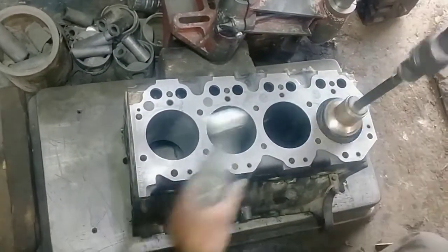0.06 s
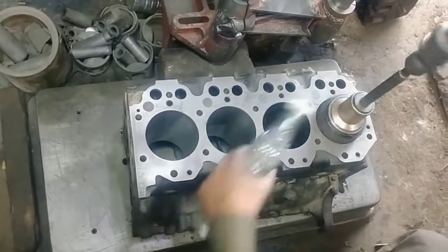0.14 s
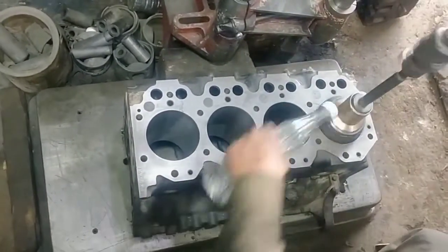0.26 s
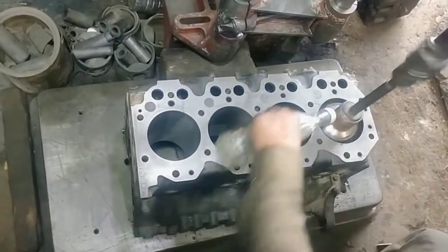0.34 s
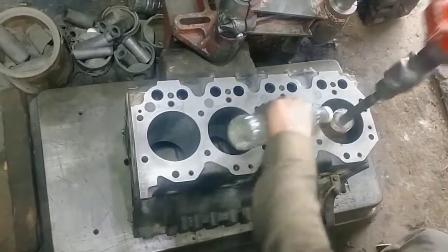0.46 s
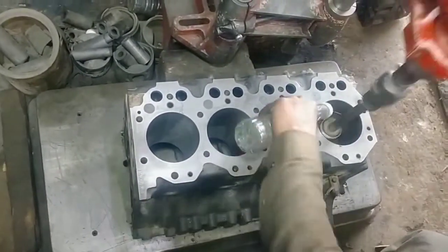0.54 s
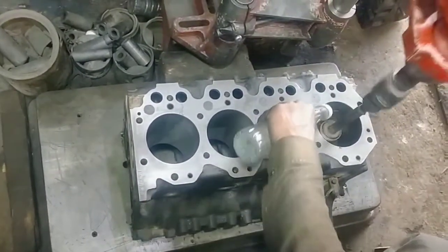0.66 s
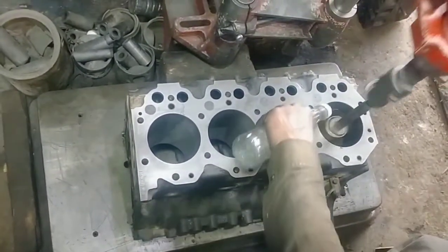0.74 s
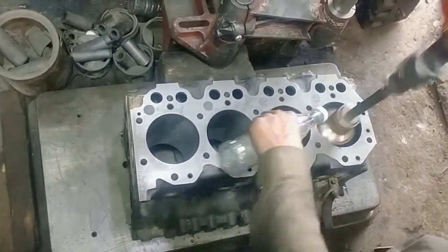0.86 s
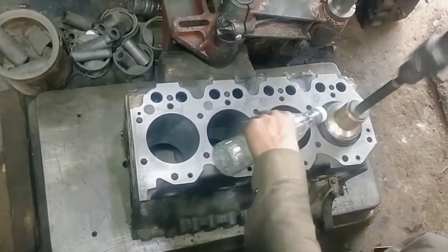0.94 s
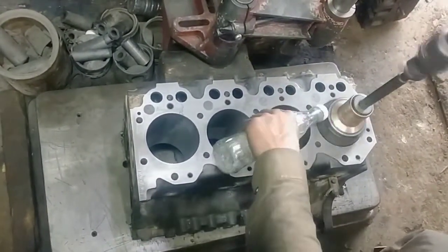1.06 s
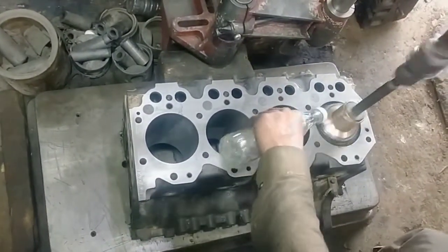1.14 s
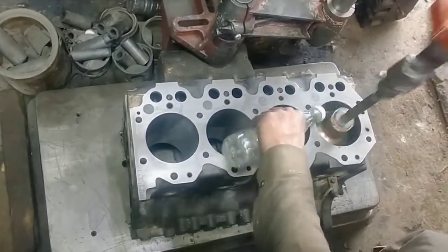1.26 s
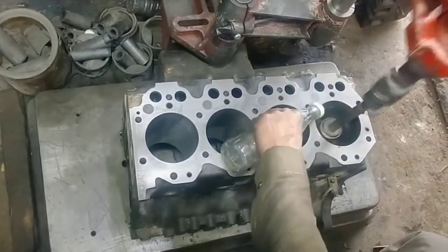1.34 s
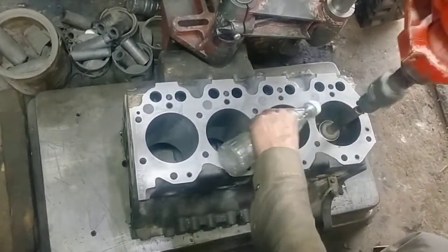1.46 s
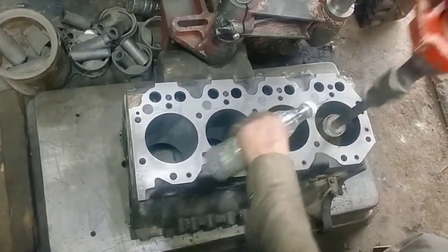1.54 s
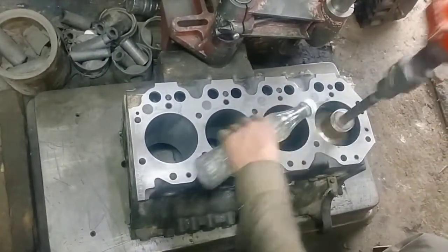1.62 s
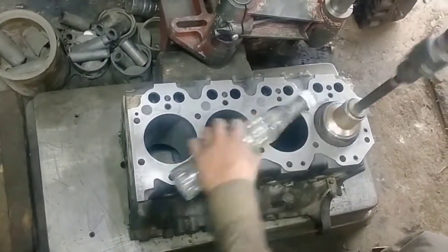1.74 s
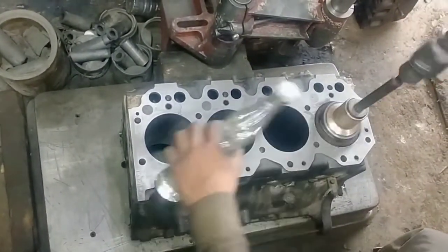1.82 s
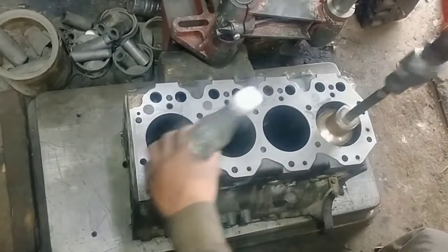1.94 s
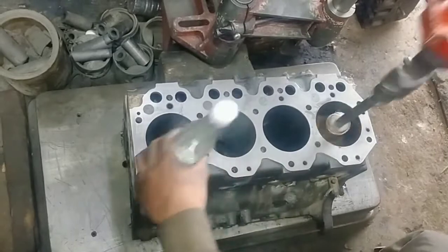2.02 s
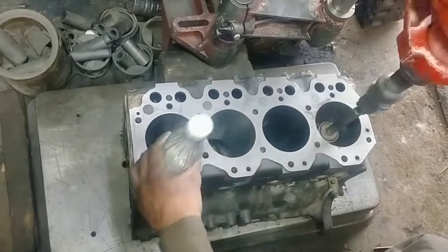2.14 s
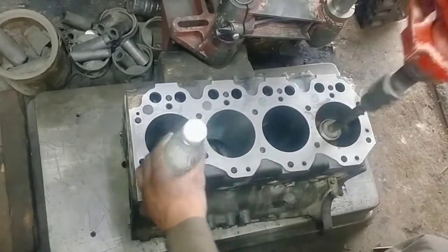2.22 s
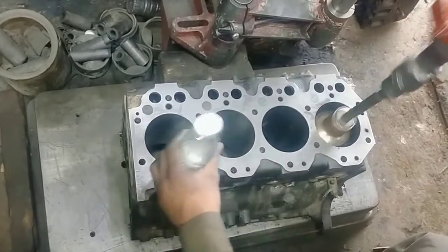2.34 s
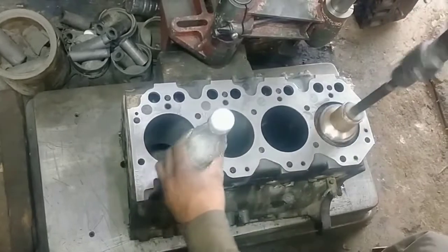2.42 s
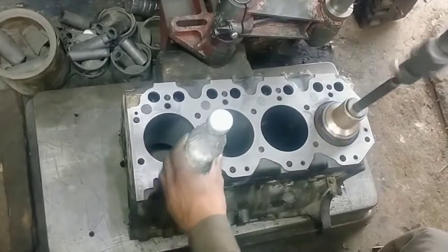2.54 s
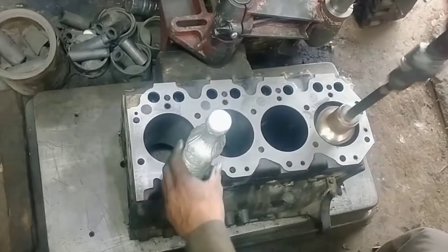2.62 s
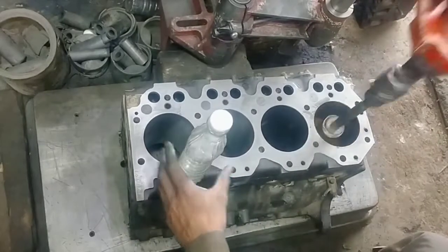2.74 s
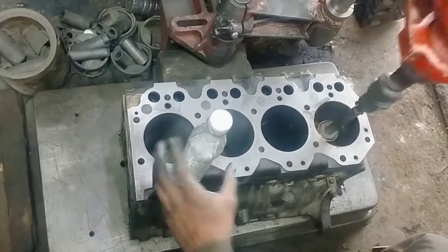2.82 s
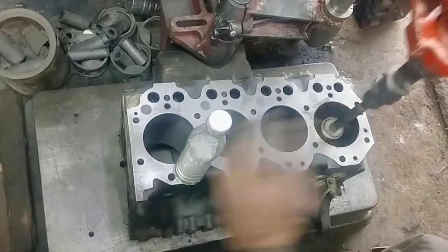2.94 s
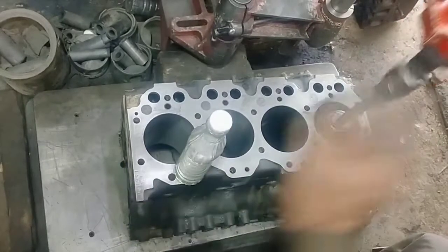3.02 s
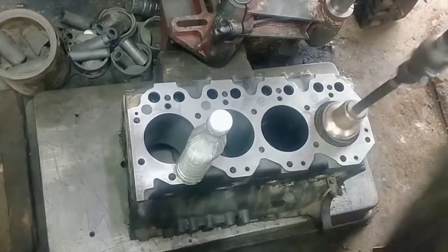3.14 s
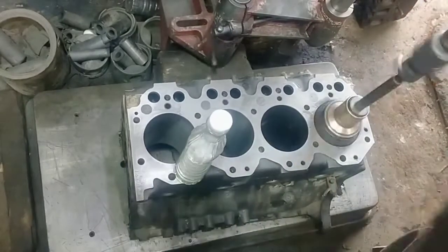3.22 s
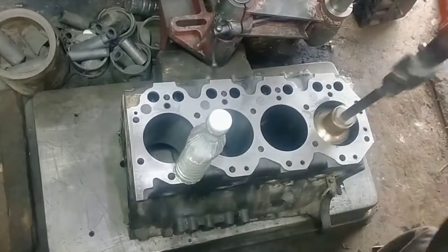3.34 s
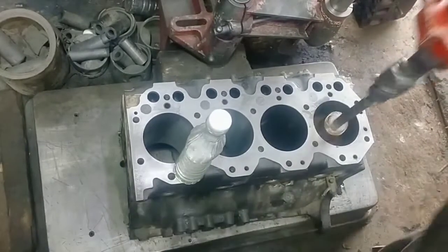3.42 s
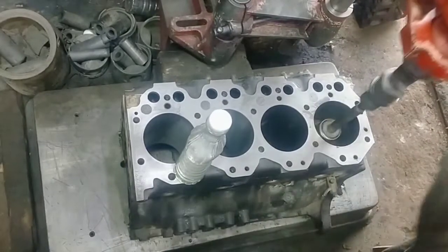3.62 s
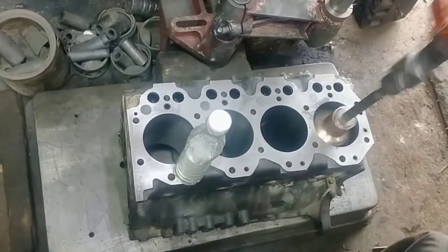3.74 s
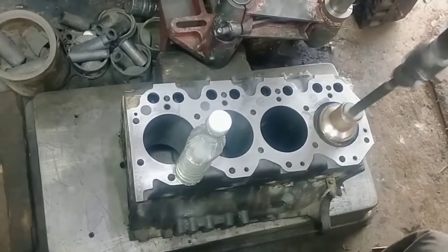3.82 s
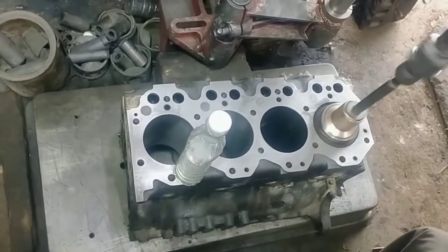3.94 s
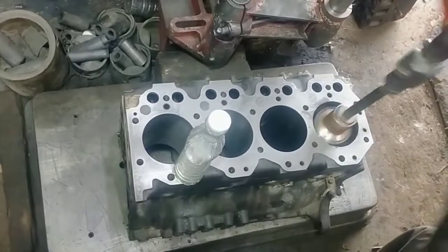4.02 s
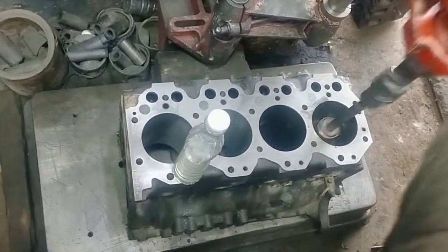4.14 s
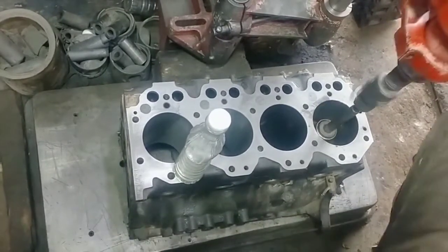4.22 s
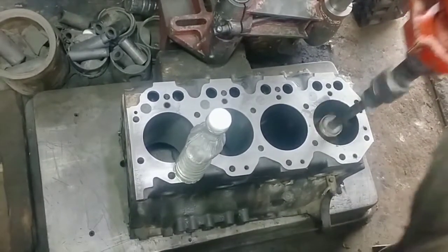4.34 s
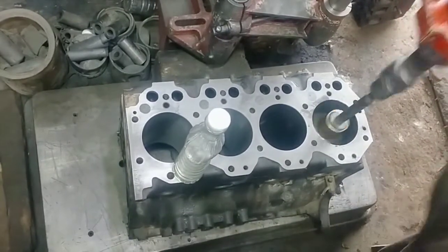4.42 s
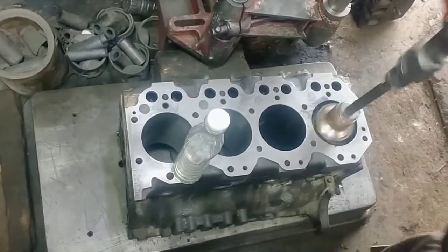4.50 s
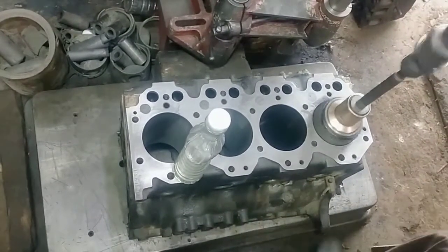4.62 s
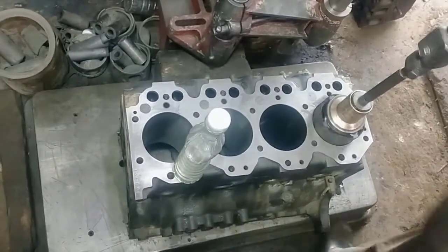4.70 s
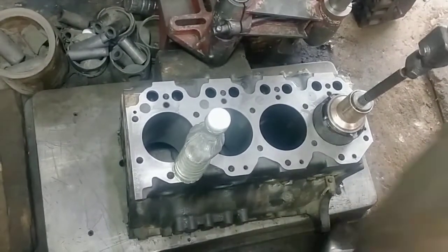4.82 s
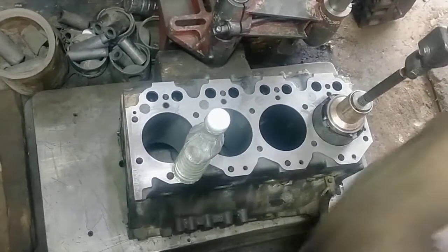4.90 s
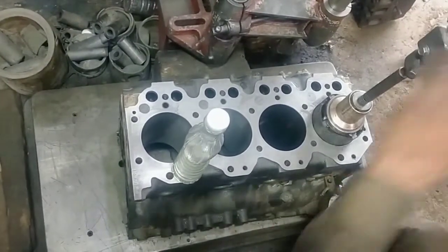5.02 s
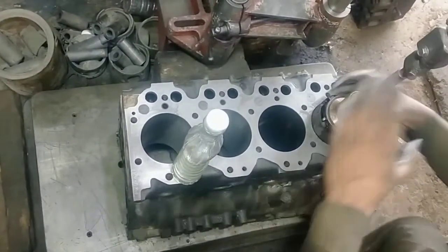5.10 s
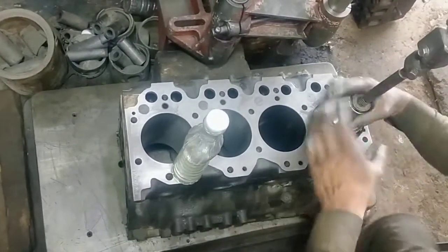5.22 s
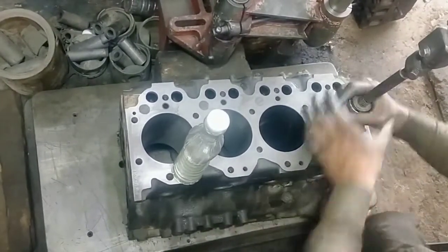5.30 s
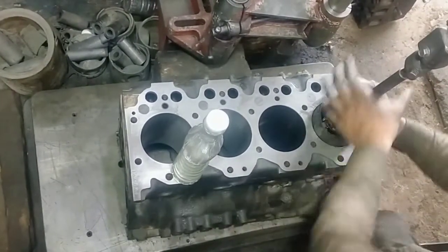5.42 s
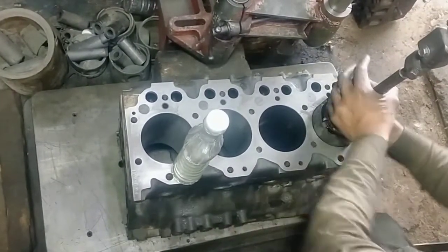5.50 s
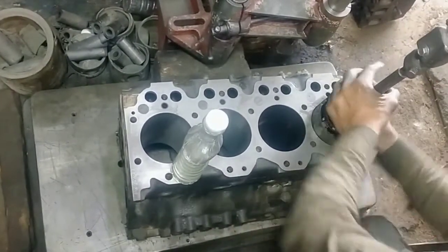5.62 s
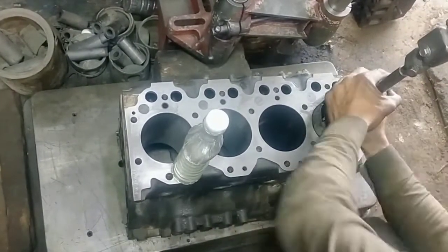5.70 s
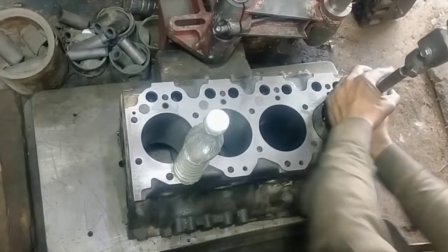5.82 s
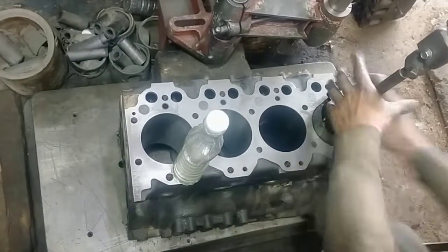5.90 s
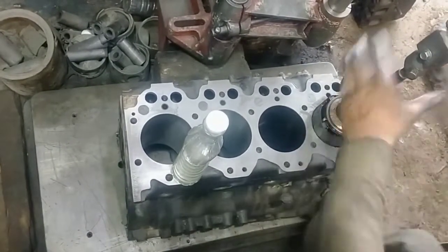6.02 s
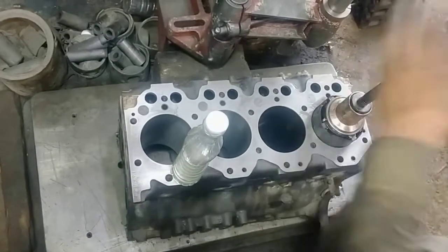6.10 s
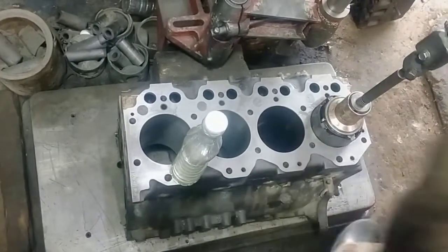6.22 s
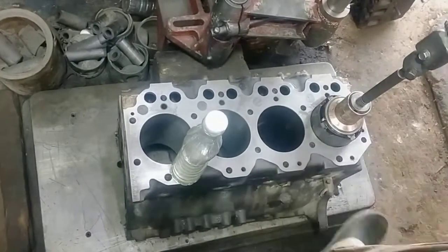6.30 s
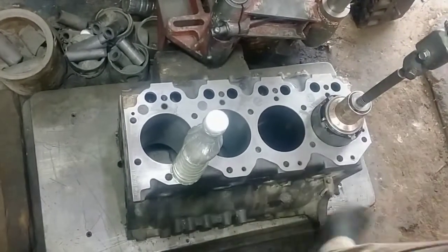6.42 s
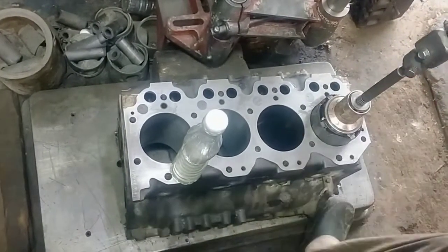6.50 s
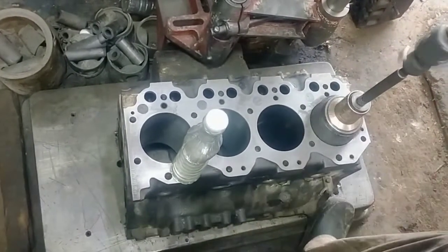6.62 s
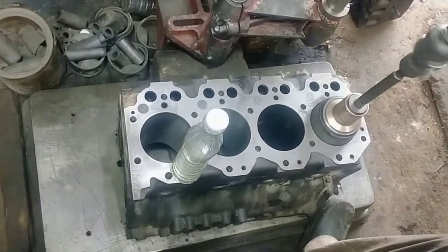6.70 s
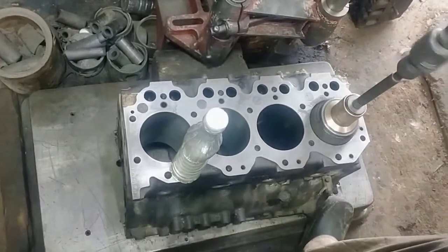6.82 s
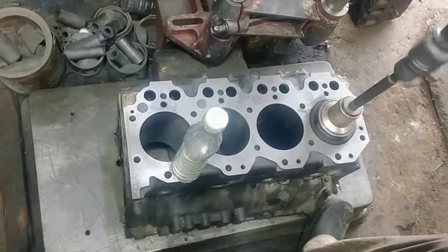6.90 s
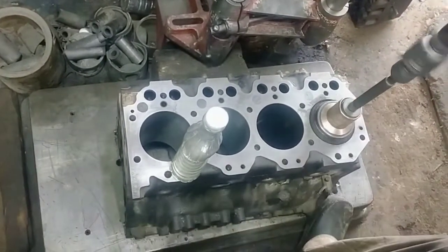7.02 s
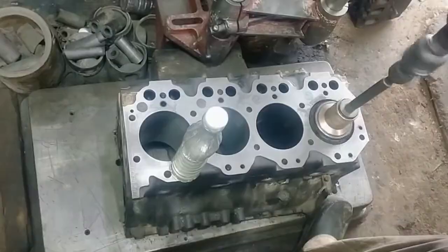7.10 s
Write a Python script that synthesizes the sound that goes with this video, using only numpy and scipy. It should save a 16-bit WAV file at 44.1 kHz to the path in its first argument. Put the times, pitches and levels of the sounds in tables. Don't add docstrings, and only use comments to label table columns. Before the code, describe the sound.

Steady engine hum with gritty honing hiss and dull metallic clunks; the drill cuts out, small steel clicks follow, then it bites again, growling.

```python
import sys
import numpy as np
from scipy import signal
from scipy.fft import rfft, irfft, next_fast_len
from scipy.io import wavfile

SR = 44100
rng = np.random.default_rng(int(sys.argv[2]) if len(sys.argv) > 2 else 0)


def store_wav(level_fs):
    pcm = np.round(np.clip(np.atleast_2d(level_fs), -1, 1) * 32767)
    wavfile.write(sys.argv[1], SR, pcm.T.astype(np.int16))


def nominal_scale(level):
    x = np.asarray(level, float) / 20
    return 10 ** x


N = 315315
TIME = np.arange(N) / SR

# multiple of the engine cycle, level in dB.
EXHAUST_ORDERS = [(1, -29), (4, -3.5), (5, -30.5), (6, -11), (7, -10), (8, -9.5), (9, -11.5), (10, -15),
                  (11, -17.5), (12, 2.5), (14, -11.5), (15, -10), (16, -9), (17, -25), (18, -11),
                  (19, -15.5), (20, -13), (21, -32.5), (22, -29.5), (23, -26.5), (24, -14), (25, -29.5),
                  (27, -30.5), (28, -23.5), (29, -35.5), (30, -23.5), (31, -33), (32, -22), (34, -23),
                  (36, -35.5)]
# multiple, dB per Hz of firing rate.
ORDER_SLIDES = [(8, -2.2), (10, 3.5), (14, 0.5), (15, -0.2), (20, -2)]
# multiple, dB per Hz.
ORDER_DETUNES = [(4, 0.5), (12, 1.5)]
# frequency in Hz, density in dB per Hz.
ROAR_SPECTRUM = [(200, -10.5), (290, 4), (348, -11), (400, 0), (520, -8), (730, -6), (1000, -13.5),
                 (1400, -20), (1650, -22), (1950, -29.5), (2550, -24.5), (3000, -32), (3500, -40.5),
                 (4200, -59.5)]
# frequency in Hz, level in dB.
GEAR_LINES = [(425.3, -50.5), (570.6, -53), (726.7, -53.5), (1146, -58.5), (1405, -64.5), (2320, -62.5),
              (2595, -74), (6869, -95)]
# multiple of the growl pitch, level in dB.
GROWL_HARMONICS = [(1, 0), (2, -5), (3, -11.5), (4, -20), (5, -28), (7, -22), (10, -37)]
# time in seconds, pressure in dB.
PRESSURE = [(0, 1.1), (.7, 1.1), (1.5, -0.1), (2.3, 0.7), (3.2, 0.5), (3.6, .1), (4.0, -0.5), (4.3, 0.5),
            (4.6, -1.5), (6.55, -0.4), (7.15, -1.8)]
# frequency in Hz, density in dB per Hz.
STONE_SPECTRUM = [(3600, -28), (4070, -10), (4660, -8), (5100, -15), (6640, -12.5), (7930, -17.5),
                  (9590, -11), (10200, -5), (10700, 3), (11400, -1), (12500, -3.5), (14900, -9),
                  (15600, -2)]
# frequency in Hz, density in dB per Hz.
BORE_SPECTRUM = [(1000, -11), (1700, -15.5), (2080, -4), (2370, 1.5), (2510, 4), (3400, -10.5), (3690, -19),
                 (4200, -32), (5460, -49), (9240, -120)]
# frequency in Hz, density in dB per Hz.
BLOCK_SPECTRUM = [(190, -32.5), (320, -4.5), (419, -2.5), (452, -46), (473, -4.5), (705, -2), (1120, -9.5),
                  (1740, -18.5), (2000, -21), (2600, -60.5), (4400, -120)]
# frequency in Hz, density in dB per Hz.
SHOP_SPECTRUM = [(2240, -34.5), (3800, -6.5), (4750, -9), (5310, -12), (7340, -12.5), (7470, -13.5),
                 (8920, -17), (10100, -9.5), (10800, -3.5), (13000, -17.5), (15500, -19.5)]
# frequency in Hz, level in dB.
SHOP_LINES = [(3500, -84), (7000, -90)]
# start in seconds, thud in dB, clatter in dB, T60 in seconds.
KNOCKS = [(0.564, -22.5, -42, 0.083), (0.571, -32, -43.5, 0.088), (0.594, -25.5, -41.5, 0.49),
          (0.869, -42, -66, 0.28), (1.389, -22, -45.5, 0.3), (2.119, -23, -40.5, 0.15),
          (2.143, -38, -45, 0.21), (2.2, -28, -54, 0.32), (2.711, -44, -49.5, 0.15),
          (2.818, -24.5, -41.5, 0.2), (2.843, -45, -48, .2), (3.505, -23.5, -43.5, 0.28),
          (3.545, -31, -48, 0.39), (3.93, -36, -51, 0.16), (4.205, -28, -47, 0.39), (4.353, -43, -49, 0.5),
          (4.88, -25, -58, 0.34), (4.901, -25, -48.5, 0.25), (4.921, -29, -58.5, 0.5),
          (5.14, -27.5, -62, 0.49), (6.206, -45, -70.5, 0.26), (6.532, -28.5, -48, 0.36),
          (6.551, -26.5, -41, 0.27), (6.574, -29, -50, 0.15)]
# frequency in Hz, density in dB per Hz.
THUD_SPECTRUM = [(110, -9.5), (200, 1), (450, -3), (750, -3), (1200, -4), (1800, -14)]
# frequency in Hz, density in dB per Hz.
CLATTER_SPECTRUM = [(3500, 0), (4500, -7), (5600, -12), (6500, -12.5), (6900, -5.5), (7300, -12.5),
                    (8500, -13.5), (10700, 6.5), (12500, -3.5), (15500, -9)]
# frequency in Hz, level in dB, T60 in seconds.
BLOCK_MODES = [(189, 12, 0.38), (268, -3, 0.24), (427, 0.5, 0.087), (544, -3, 0.18), (720, -3, 0.037),
               (948, 9.5, 0.055), (1090, 0, 0.11), (1257, -23, 0.055), (1420, -7, .07)]
# frequency in Hz, level in dB, T60 in seconds.
TOOL_MODES = [(2480, -19, 0.088), (2600, -18.5, 0.1), (2780, 1.5, 0.27), (3570, -2, 0.058),
              (4410, -15.5, .08)]
# start in seconds, peak in dB, block in Hz, tool in Hz.
RINGS = [(0.563, -23.5, 1090, 2470), (0.622, -28, 840, 2580), (1.39, -34, 567, 2450),
         (2.119, -37, 800, 2610), (2.817, -27, 620, 2600), (3.505, -17, 624, 2430), (3.562, -23, 683, 2470),
         (4.235, -32, 684, 2490), (4.902, -21.5, 520, 2910), (4.924, -18, 587, 2650),
         (6.55, -22, 960, 2570), (6.574, -23, 512, 2480)]
# start in seconds, level in dB, frequency in Hz.
JINGLES = [(.622, -68, 6860), (2.135, -62, 6900), (3.56, -70, 6900), (4.885, -29.5, 434), (4.9, -34, 577),
           (4.905, -37, 720), (4.91, -45, 1034), (4.905, -64, 4410), (4.935, -61, 4410),
           (4.916, -40.5, 2780), (4.94, -46, 2810), (6.283, -64, 6200), (6.287, -46, 11400),
           (6.29, -58, 15100), (6.30, -54, 10190), (6.315, -62, 13400), (6.354, -56, 9500),
           (6.354, -52, 12580), (6.40, -61, 11500), (6.42, -62, 13600), (6.50, -69, 7100),
           (6.535, -58, 15100), (6.553, -58, 4200), (6.553, -58, 5960), (6.556, -53, 11300),
           (6.565, -60, 14400), (6.58, -57, 6740)]
# start in seconds, level in dB.
PIN_BLOW = (3.155, -48.5)
# frequency in Hz, level in dB, T60 in seconds.
PIN_MODES = [(4743, -20, .15), (5600, -14, .015), (7400, -12, .015), (9502, 0, .36), (9690, -12, .12),
             (10500, 2, .015), (12500, -2, .015), (15030, -3, .2)]
# start in seconds, level in dB, hold in seconds.
SHUFFLES = [
    (6.267, -54, 0.042),
    (6.34, -59.5, .02),
    (6.385, -62, .03),
]
# frequency in Hz, density in dB per Hz.
HOLDER_SPECTRUM = [(2650, -47), (4500, -21), (5400, -23), (6210, -12), (6780, -23), (8390, -19.5),
                   (9210, -17.5), (11000, -3), (15600, -16)]

STOP_S, COAST_S = 4.59, 0.15
RESTART_S, BITE_S = 6.545, 0.03
LOADED_HZ, IDLE_HZ, STALLED_HZ = 145.5, 147.55, 141.2
RECOVER_S, SAG_S = 0.36, 0.29
FIRINGS_PER_CYCLE = 12
DRONE_DB, FADE_IN_DB, FADE_IN_S = -24.5, -5.5, 0.032
BOOM_DB, BOOM_END_S = 8.5, 0.86
ROAR_DB, UNDER_DB = -35.5, -37.5
GEARS_DB = 3.5
GROWL_DB, GROWL_SWELL_S = -29.5, 0.1
GROWL_LOW_HZ, GROWL_HZ_PER_HZ = 344.5, 1.9
HISS_DB, BORE_DB, RUMBLE_DB = -58.5, -49, -37.5
HISS_FOLLOWS, BORE_FOLLOWS, RUMBLE_FOLLOWS = 0.2, 2.7, 0.1
HISS_DIES = 1.8
TIGHT_DB, TIGHT_RUMBLE_DB = 2.8, 1
BORE_HUM_DB, BLOCK_HUM_DB = -57.5, -44.5
FLUTTER_DB, FLUTTER_PER_S = 0.8, 25
SHOP_DB = -68
BORE_SHARE, BORE_LIFT_DB, BORE_REST_DB = 0.37, -0.5, -8
HARD_T60_S, HARD_RISE_S, SOFT_RISE = 0.28, 0.0006, 0.04
RATTLE_DB, RATTLE_PER_S = 2.8, 70
BLOCK_RING_DB, TOOL_RING_DB = -10.5, -27
RING_T60_S, RING_SLOPE = 0.11, 0.36
SHIFT_S, SETTLE_DB_PER_S = 0.016, 330


def rms_one(x):
    return x / np.sqrt(np.mean(x ** 2) + 1e-20)


def since(s):
    return np.maximum(TIME - s, 0)


def drift(rate):
    r = np.exp(-80 * np.pi * rate / SR)
    slow = signal.lfilter([1], [1, -2 * r, r * r], rng.standard_normal(N // 40 + 2002))[2000:]
    return np.interp(np.arange(N) / 40, np.arange(len(slow)), rms_one(slow))


def coloured(spectrum, patchy_db, count=6):
    size = next_fast_len(N)
    pitch = np.log(np.maximum(np.fft.rfftfreq(size, 1 / SR), 1))
    hz, level_db = np.transpose(spectrum)
    at = np.log(hz)
    outside = np.maximum(at[0] - pitch, 0) + np.maximum(pitch - at[-1], 0)
    gain = nominal_scale(np.interp(pitch, at, level_db) - 82 * outside)
    whole = rfft(rng.standard_normal(size)) * gain
    centres, together = np.linspace(at[0], at[-1], count), drift(3.9)
    out = np.zeros(N)
    for row in np.eye(count):
        band = irfft(whole * np.interp(pitch, centres, row), size)[:N]
        out += band * nominal_scale(patchy_db * (1.1 * together + drift(5.4)))
    return rms_one(out)


def grit(depth_db):
    return nominal_scale(depth_db * np.minimum(rng.exponential(1, N // 64 + 1), 4)).repeat(64)[:N]


def struck(events, modes, spread_db):
    at, blow_db = np.transpose(events)
    chance = rng.standard_normal((len(at), len(modes)))
    out = np.zeros(N)
    for k, (hz, level_db, t60) in enumerate(modes):
        clicks = np.full(N, 1e-18)
        sign = (-1) ** k
        clicks[(at * SR).astype(int)] = sign * nominal_scale(blow_db + level_db + spread_db * chance[:, k])
        r, w = nominal_scale(-60 / (t60 * SR)), 2 * np.pi * hz / SR
        out += signal.lfilter([0, np.sin(w)], [1, -2 * r * np.cos(w), r * r], clicks)
    return out


def spinning():
    return np.clip(1 - since(STOP_S) / COAST_S, 0, 1), np.clip(since(RESTART_S) / BITE_S, 0, 1)


def firing_rate():
    relief = (IDLE_HZ - LOADED_HZ) * (1 - np.exp(-since(STOP_S) / RECOVER_S))
    sag = (IDLE_HZ - STALLED_HZ) * (1 - np.exp(-since(RESTART_S) / SAG_S))
    return LOADED_HZ + relief - sag


def generator():
    firing_hz = firing_rate()
    off_hz = firing_hz - LOADED_HZ
    boom_db = BOOM_DB * np.clip(1 - (TIME / BOOM_END_S) ** 2, 0, 1)
    cycles = np.cumsum(firing_hz) / FIRINGS_PER_CYCLE / SR
    drone = np.zeros(N)
    for k, load_db in EXHAUST_ORDERS:
        level_db = load_db + dict(ORDER_SLIDES).get(k, 0) * off_hz + boom_db * (k == 6)
        level_db += dict(ORDER_DETUNES).get(k, 0) * np.minimum(off_hz, 0)
        waver_db = np.clip(0.12 * (k - 10), 0.5, 2) * drift(2)
        lag = 0.137 * k * k
        phase = 2 * np.pi * (k * cycles + lag) + 0.025 * k * drift(0.79)
        drone += nominal_scale(level_db + waver_db) * np.sin(phase)
    drone_db = DRONE_DB + 0.46 + FADE_IN_DB * np.exp(-TIME / FADE_IN_S)

    pulse = 1 + 0.15 * np.cos(24 * np.pi * cycles)
    pulse += 0.2 * np.cos(8 * np.pi * cycles) + 0.08 * np.cos(4 * np.pi * cycles)
    high_pass = signal.butter(2, 260, "high", fs=SR, output="sos")
    roar = rms_one(signal.sosfilt(high_pass, coloured(ROAR_SPECTRUM, patchy_db=0.72)))
    under = coloured([(40, -12), (62, 0), (85, 0), (130, -4), (300, -8)], patchy_db=0.4, count=2)
    engine = nominal_scale(drone_db) * rms_one(drone) + pulse * nominal_scale(ROAR_DB) * roar + nominal_scale(UNDER_DB) * under
    return engine, pulse


def drill():
    gears = np.zeros(N)
    for hz, level_db in GEAR_LINES:
        wander = (1.2 + hz / 1100) * drift(3)
        gears += nominal_scale(level_db + 3 + 2.0 * drift(3)) * np.sin(2 * np.pi * hz * TIME + wander)

    growl_hz = GROWL_LOW_HZ + GROWL_HZ_PER_HZ * (firing_rate() - STALLED_HZ)
    turns, judder = np.cumsum(growl_hz) / SR, drift(25)
    growl = np.zeros(N)
    for k, level_db in GROWL_HARMONICS:
        phase = k * 2 * np.pi * turns + 0.38 * k ** 0.55 * judder
        growl += nominal_scale(level_db + 2.5 * drift(20)) * np.sin(phase)
    swell = 1 - np.exp(-since(RESTART_S) / GROWL_SWELL_S)
    return gears * nominal_scale(GEARS_DB) * spinning()[0] + nominal_scale(GROWL_DB) * swell * growl


def hone(pulse):
    pressure_db = np.interp(TIME, *np.transpose(PRESSURE))
    first, again = spinning()
    first = first * nominal_scale(FLUTTER_DB * drift(FLUTTER_PER_S))
    scrape = first ** HISS_DIES + nominal_scale(TIGHT_DB) * again
    rub = first + nominal_scale(TIGHT_DB) * again
    grind = first + nominal_scale(TIGHT_RUMBLE_DB) * again

    hiss = rms_one(coloured(STONE_SPECTRUM, patchy_db=0.7) * grit(depth_db=1.2)) * pulse ** 0.4
    bore = coloured(BORE_SPECTRUM, patchy_db=0.7, count=3)
    block = coloured(BLOCK_SPECTRUM, patchy_db=-0.35, count=4)
    hiss_gain = nominal_scale(HISS_DB + HISS_FOLLOWS * pressure_db) * scrape
    bore_gain = np.hypot(nominal_scale(BORE_DB + BORE_FOLLOWS * pressure_db) * rub, nominal_scale(BORE_HUM_DB))
    block_gain = np.hypot(nominal_scale(RUMBLE_DB + RUMBLE_FOLLOWS * pressure_db) * grind, nominal_scale(BLOCK_HUM_DB))
    return hiss_gain * hiss + bore_gain * bore + block_gain * block


def workshop():
    whine = np.zeros(N)
    for hz, level_db in SHOP_LINES:
        whine += nominal_scale(level_db + 4 * drift(8)) * np.sin(2 * np.pi * hz * TIME + 2 * drift(6))
    return nominal_scale(SHOP_DB) * coloured(SHOP_SPECTRUM, patchy_db=0.2) + whine


def knocks():
    at, thuds_db, hisses_db, t60s = np.transpose(KNOCKS)
    at_rest = (at > STOP_S) & (at < RESTART_S + BITE_S / 2)
    bores_db = thuds_db + BORE_SHARE * (hisses_db - thuds_db) + BORE_LIFT_DB + BORE_REST_DB * at_rest
    block = struck(np.transpose([at, thuds_db - 16.5]), BLOCK_MODES, spread_db=1.0)
    tool = struck(np.transpose([at, bores_db - 24.5]), TOOL_MODES, spread_db=7.5)
    out = signal.sosfilt(signal.butter(4, 2200, fs=SR, output="sos"), block)
    out += signal.sosfilt(signal.butter(6, 4200, fs=SR, output="sos"), tool)

    spectra = (THUD_SPECTRUM, BORE_SPECTRUM, CLATTER_SPECTRUM)
    tails = [coloured(s, patchy_db=0.4, count=3) for s in spectra]
    tails[1:] = [rms_one(tail * nominal_scale(RATTLE_DB * drift(RATTLE_PER_S))) for tail in tails[1:]]
    for s, thud_db, bore_db, hiss_db, t60 in zip(at, thuds_db, bores_db, hisses_db, t60s):
        i = int(s * SR)
        age = TIME[:SR // 2][:N - i]
        rise_s = HARD_RISE_S + SOFT_RISE * max(t60 - HARD_T60_S, 0)
        slap = 1 + 1.3 * np.exp(-age / 0.0028)
        fall = (1 - np.exp(-age / rise_s)) * slap * nominal_scale(-60 * age / max(t60, 0.02))
        for tail, level_db in zip(tails, (thud_db - 7.0, bore_db - 6.5, hiss_db - 6)):
            out[i:i + len(age)] += nominal_scale(level_db) * fall * tail[i:i + len(age)]
    return out


def add_partial(out, s, level_db, hz):
    i, t60 = int(s * SR), RING_T60_S * (10000 / hz) ** RING_SLOPE
    age = TIME[:SR // 2][:N - i]
    pair = np.sin(2 * np.pi * hz * age)
    pair += 0.6 * np.sin(2 * np.pi * (1.025 * hz * age + rng.random()))
    envelope = nominal_scale(level_db - 60 * age / max(t60, 0.02)) * (1 - np.exp(-age / 0.001))
    out[i:i + len(age)] += envelope * pair


def rings():
    out = np.zeros(N)
    for s, peak_db, block_hz, tool_hz in RINGS:
        add_partial(out, s, peak_db + BLOCK_RING_DB, block_hz)
        add_partial(out, s, peak_db + TOOL_RING_DB, tool_hz)
    for s, level_db, hz in JINGLES:
        add_partial(out, s, level_db, hz)
    return out


def pin():
    return struck([PIN_BLOW], PIN_MODES, spread_db=0)


def holder():
    gain = np.zeros(N)
    for s, level_db, hold_s in SHUFFLES:
        rise = np.clip(since(s) / SHIFT_S, 0, 1) ** 2
        gain += rise * nominal_scale(level_db - SETTLE_DB_PER_S * since(s + SHIFT_S + hold_s))
    return gain * rms_one(coloured(HOLDER_SPECTRUM, patchy_db=1.6) * grit(depth_db=2.2))


def scene():
    engine, pulse = generator()
    steel = knocks() + rings() + pin() + holder()
    return (engine + drill() + hone(pulse) + workshop() + steel)[None]


def low_pass(x):
    return signal.sosfilt(signal.butter(12, 15710, fs=SR, output="sos"), x)


def record(dry):
    mix = signal.sosfilt(signal.butter(3, 34, "high", fs=SR, output="sos"), dry)
    mix = 0.4 * np.tanh(mix / 0.4)
    mix = signal.sosfilt(signal.cheby2(12, 60, 16400, fs=SR, output="sos"), mix)
    return low_pass(mix)


dry = scene()
out = record(dry)
store_wav(out)
```